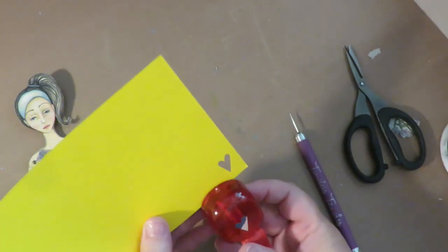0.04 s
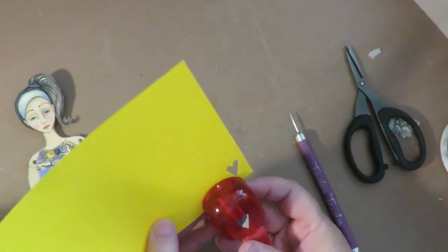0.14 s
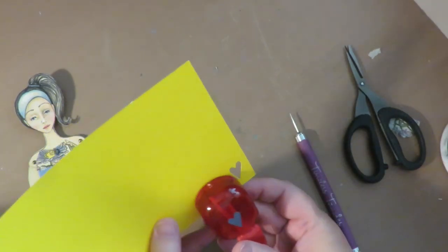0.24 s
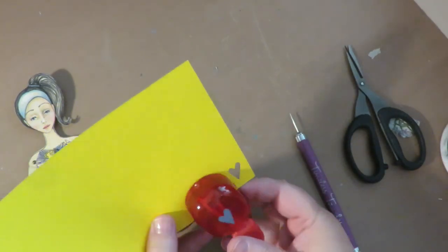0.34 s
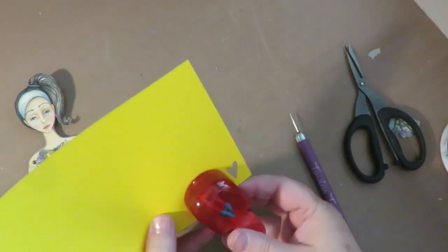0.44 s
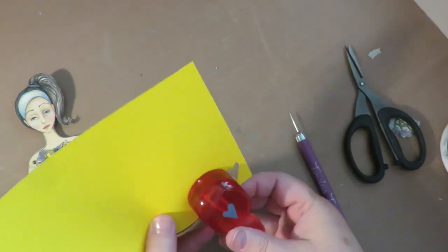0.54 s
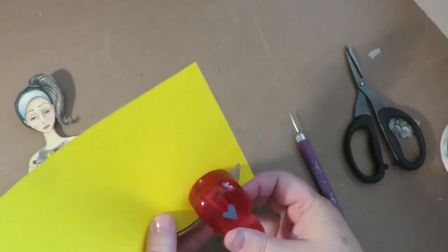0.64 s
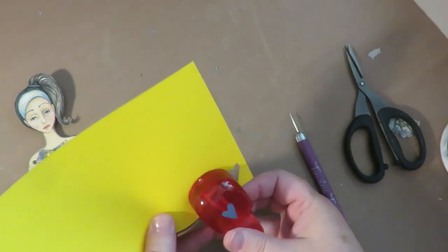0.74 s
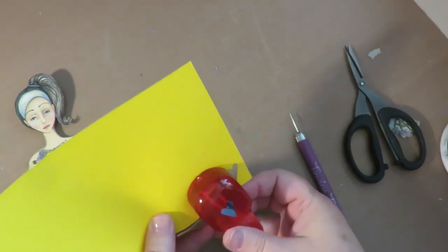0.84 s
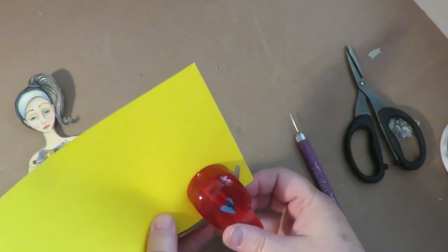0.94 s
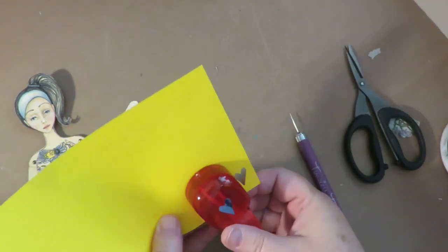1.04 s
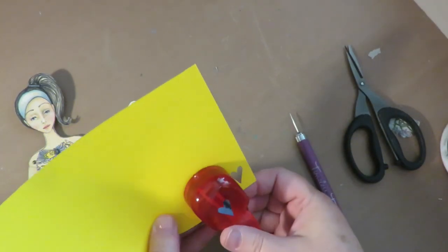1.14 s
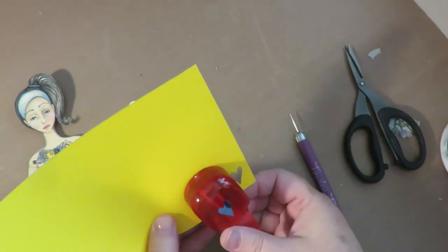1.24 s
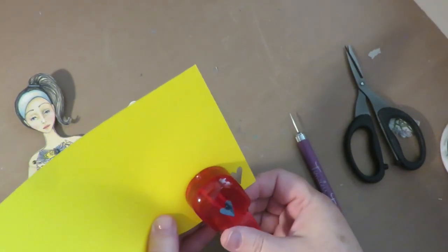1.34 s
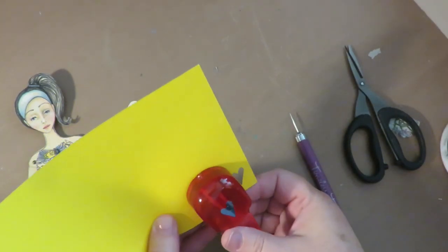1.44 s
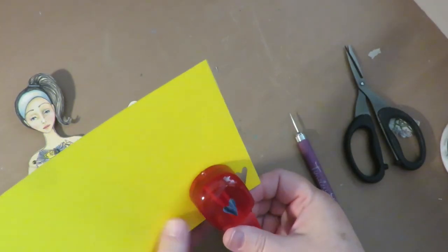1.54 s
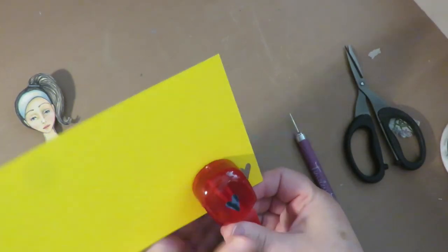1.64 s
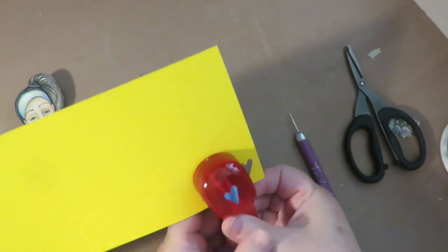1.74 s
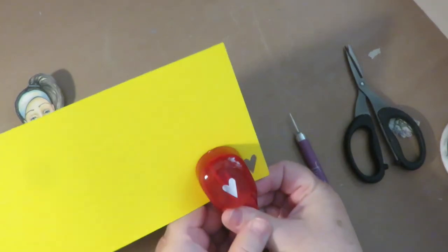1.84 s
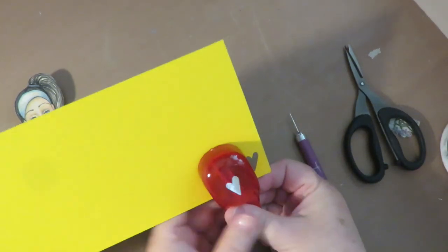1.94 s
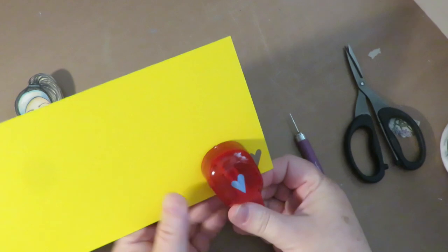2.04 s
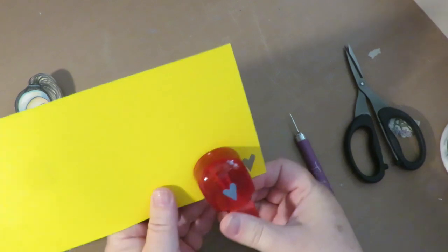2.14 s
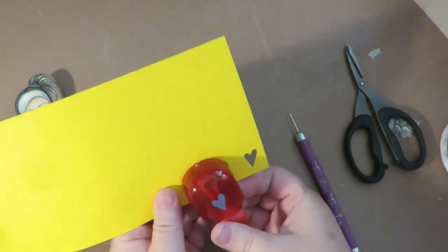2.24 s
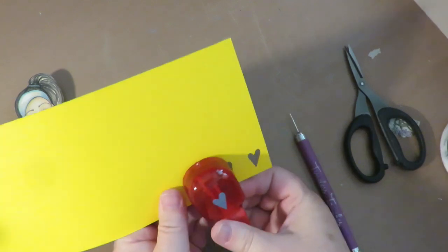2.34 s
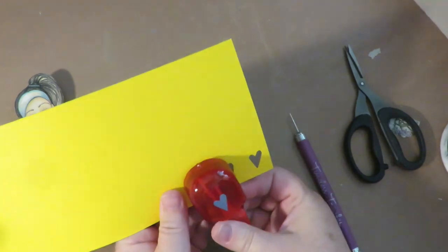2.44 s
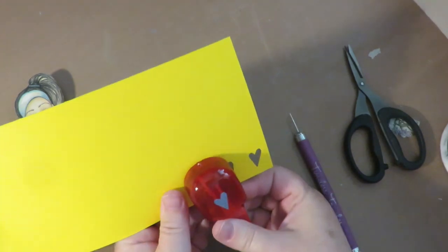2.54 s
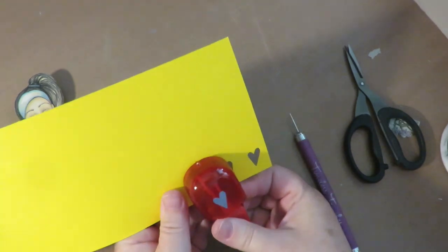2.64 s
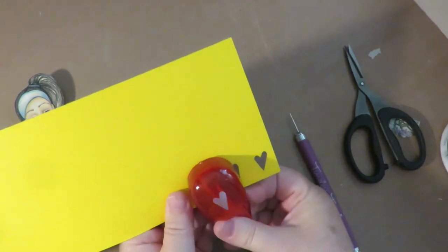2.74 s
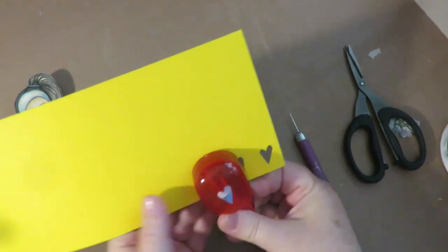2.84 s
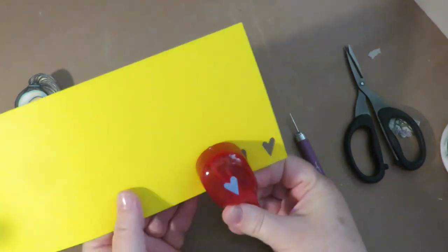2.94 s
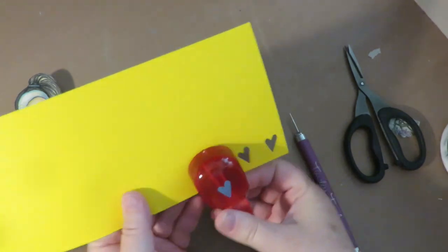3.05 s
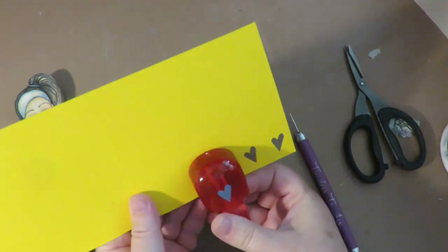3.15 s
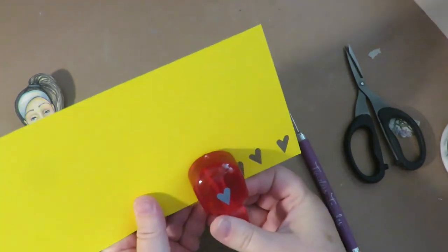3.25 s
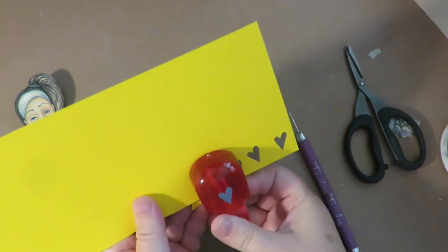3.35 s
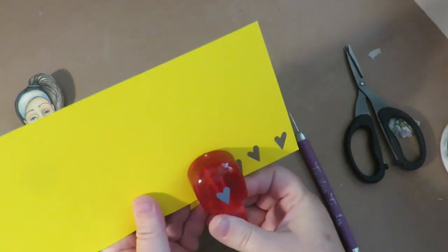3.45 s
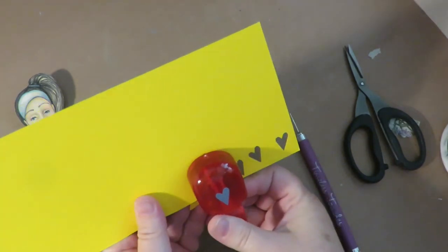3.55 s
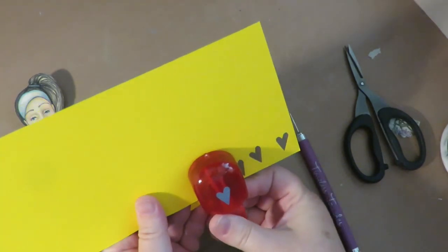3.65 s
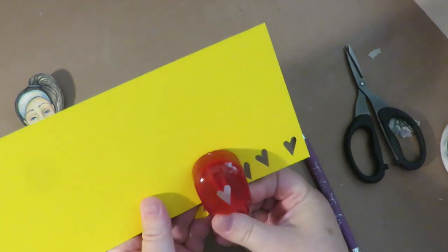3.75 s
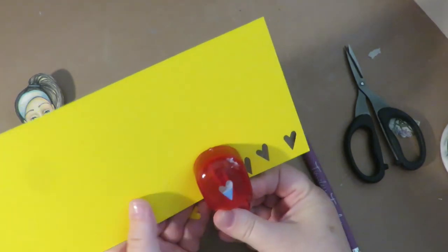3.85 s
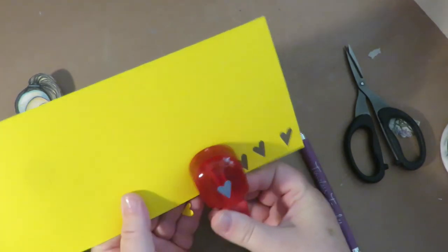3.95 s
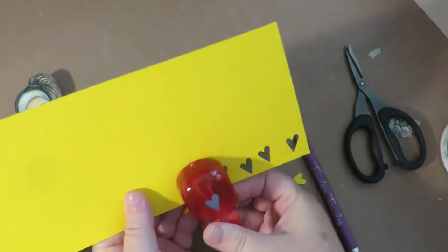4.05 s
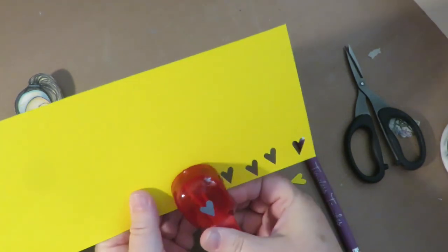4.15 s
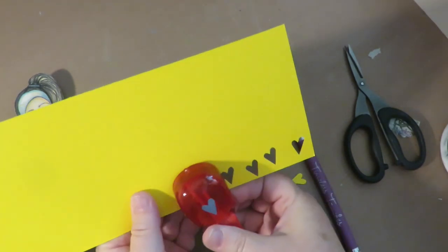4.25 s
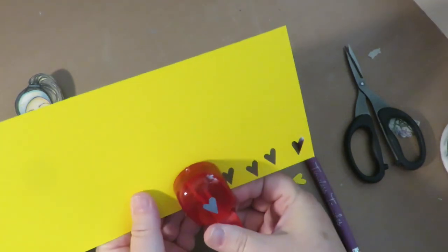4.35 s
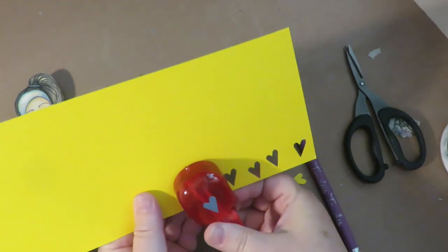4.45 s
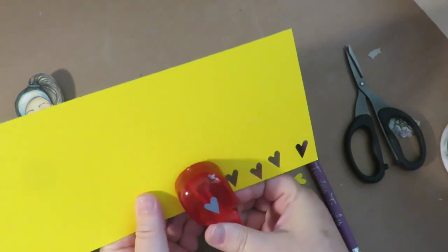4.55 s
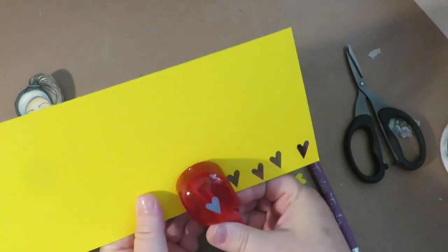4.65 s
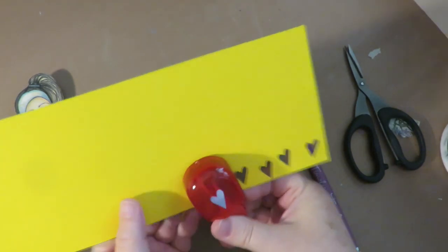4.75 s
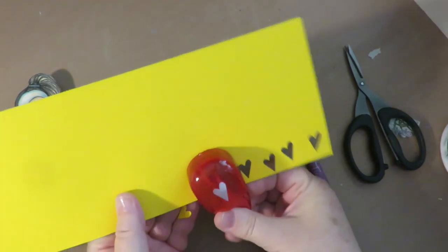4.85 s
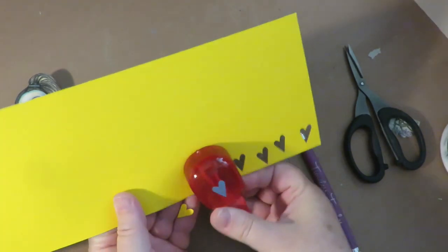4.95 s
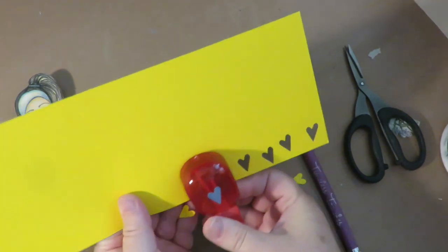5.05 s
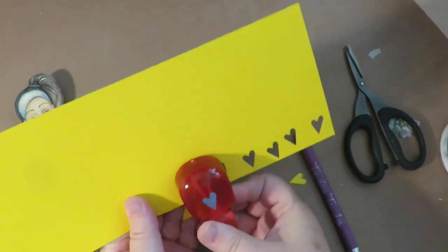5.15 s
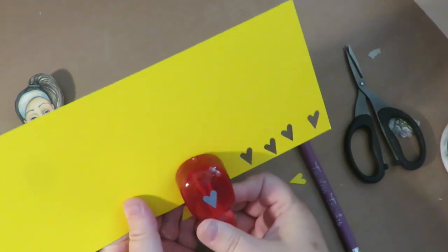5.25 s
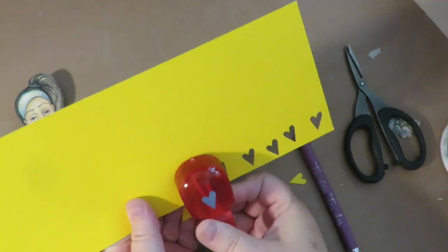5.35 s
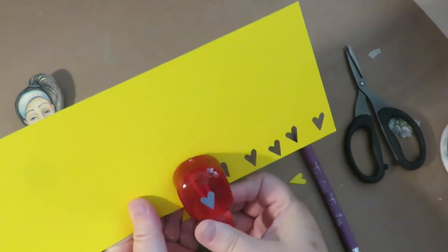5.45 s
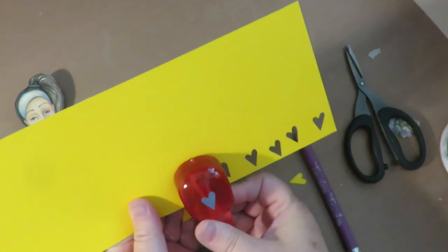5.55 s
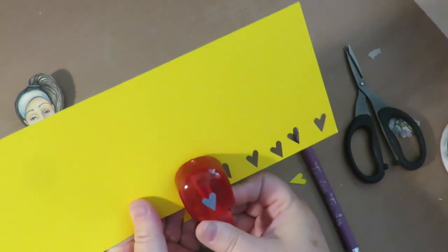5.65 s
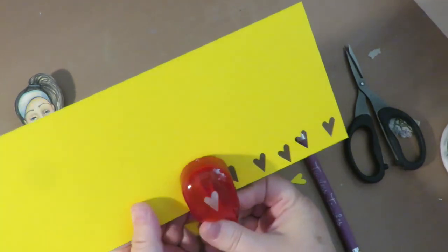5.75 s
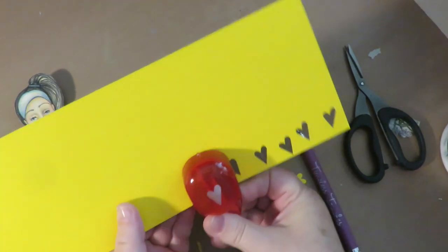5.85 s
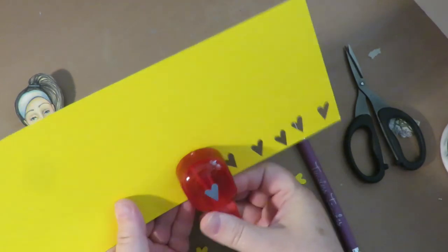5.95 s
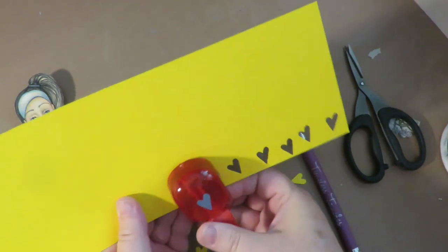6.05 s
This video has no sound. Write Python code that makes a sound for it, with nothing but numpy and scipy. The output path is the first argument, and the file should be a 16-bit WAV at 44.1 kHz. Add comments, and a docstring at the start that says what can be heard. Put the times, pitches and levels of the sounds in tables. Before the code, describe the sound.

A handheld plastic punch cuts a sheet of card close to the microphone. First the card slides and flexes faintly in the slot. Then come five sharp snaps about a second apart, each led by a brief crunch of card. Lighter lever ticks and soft rubbing fall between them, with one louder click after the fourth snap. The small room adds a short echo over faint hum and hiss.

```python
"""A hand-held plastic punch cuts five shapes from a card sheet, close under a camera microphone.
Each stroke: the lever ticks, the die shears the card, the punch snaps home, the spring lets go
and the sheet flexes. Between strokes the card slides in the slot. The punch sits dead centre
in a small room; table and walls echo it all over room hum and microphone hiss."""
import sys
import numpy as np
from scipy import signal
from scipy.fft import rfft, irfft
from scipy.io import wavfile

SR = 44100
rng = np.random.default_rng(int(sys.argv[2]) if len(sys.argv) > 2 else 0)


def unload_audio(sound):
    """Save the sound as a 16-bit wav file, at the path given as the first command line argument."""
    columns = np.transpose(np.atleast_2d(sound))
    # keep every value between -1 and 1, then stretch to whole-number steps
    steps = np.round(np.clip(columns, -1, 1) * 32767)
    wavfile.write(sys.argv[1], SR, steps.astype(np.int16))


N = 268304


def undb(db):
    """Decibels to gain."""
    return 10 ** (np.asarray(db) / 20)


def ring(x, modes, passes=1):
    """Sum of band-pass resonances with alternating sign; more passes soften the rise, steepen the skirts."""
    out = 0
    for k, (hz, width, db) in enumerate(modes):
        b, a = signal.iirpeak(hz, hz / width, fs=SR)
        y = x
        for _ in range(passes):
            y = signal.lfilter(b, a, y)
        out = out + (-1) ** k * undb(db) * y
    return out


def colour(points):
    """Gain at every frequency bin from (frequency [Hz], level [dB]) points."""
    hz, db = np.transpose(points)
    bin_hz = np.arange(N // 2 + 1) * SR / N
    return undb(np.interp(np.log(bin_hz + 1), np.log(hz), db))


def strike(start, peaks_db, body, push, rattle):
    """A push rings a body and the card, the die's rattle rings the metal; each peaks at its own level."""
    # resonances of the thumped card and of the metal die: (frequency [Hz], width [Hz], level [dB])
    card_modes = [(916, 660, 18.5), (477, 990, 4.5), (1070, 190, -41), (375, 570, -12.5), (111, 25, -5.5)]
    metal_modes = [(3550, 950, -3), (5600, 1300, 0), (7100, 2800, -7.5), (9750, 1100, -4),
                   (11460, 1900, -13.5), (14400, 2900, -21.5)]
    parts = ring(push, body, passes=3), ring(push, card_modes, passes=2), ring(rattle, metal_modes)
    out, i = np.zeros(N + SR), int(start * SR)
    out[i:i + len(push)] = sum(undb(db) * p / np.abs(p).max() for db, p in zip(peaks_db, parts))
    return out[:N]


def gestures(moves, rise_db_s, fall_db_s):
    """Each move swells, holds and dies away; gains of its main part and of its second colour."""
    t, gains = np.arange(0, N, 32) / SR, 0
    for full_at, held, db, second_db in moves:
        before, after = np.maximum(full_at - t, 0), np.maximum(t - full_at - held, 0)
        gain = undb(db - rise_db_s * before - fall_db_s * after)
        gains = gains + np.outer([1, undb(second_db)], gain)
    return [np.interp(np.arange(N) / SR, t, g) for g in gains]


def room_tone(mid_db=-53.5):
    """Steady room hum and microphone hiss, partly unlike left and right."""
    # spectrum of hum and hiss, and of their side signal against the mid: (frequency [Hz], level [dB])
    spectrum = [(15, -63), (25, -10), (82, -6), (156, -6.5), (241, -4), (307, -7), (555, -4.5), (602, -8.5),
                (727, -6.5), (1430, -11.5), (2020, -10.5), (2440, -11.5), (15700, -16)]
    side_balance = [(60, -7), (110, -8), (200, -0.5), (380, 1.5), (700, -1), (1290, -2), (2380, -5),
                    (4400, -3), (8120, -1.5), (15000, 0)]
    mid, side = rfft(rng.standard_normal((2, N))) * colour(spectrum)
    mid, side = irfft(mid, N), irfft(side * colour(side_balance), N)
    return np.array([mid + side, mid - side]) * undb(mid_db) / np.std(mid)


def lever_ticks(contact_s=0.000059, width_per_pitch=1.29):
    """Light contacts of lever and spring make short, broad clicks."""
    # ticks: (time [s], click [dB], card thump [dB], metal crack [dB], click pitch [Hz])
    ticks = [(0.0226, -31.5, -39, -58, 1680), (2.0371, -35, -29.5, -40, 1540),
             (2.1297, -52, -41, -62, 1200), (2.228, -31, -34, -39, 2660), (2.578, -22, -37, -35, 1460),
             (3.07, -17.5, -64, -37.5, 1690), (3.1985, -66, -42, -54, 1240), (3.268, -63, -46, -61, 1300),
             (3.709, -22.5, -31, -33.5, 1907), (3.9912, -25.5, -26.5, -47, 1615),
             (4.1034, -44, -29.5, -54.5, 1250), (4.675, -20, -24.5, -36, 1340),
             (4.9324, -40, -29, -64, 1560), (5.0297, -6.5, -11.5, -24, 1960),
             (5.7386, -30.5, -37.5, -40, 2090), (5.9502, -44, -25.5, -51, 1350),
             (6.0043, -23.5, -47, -34.5, 1987)]
    out, t = 0, np.arange(SR // 20) / SR
    push = t * np.exp(-t / contact_s)
    for start, *peaks_db, hz in ticks:
        rattle = rng.standard_normal(len(t)) * t * np.exp(-t / 0.00085)
        out = out + strike(start, peaks_db, [(hz, width_per_pitch * hz, 0)], push, rattle)
    return out


def sheet_flex(pops_per_s=260):
    """The card buckles in small separate pops that ring its modes; wide bends reach the lowest ones."""
    # bends: (fully on at [s], held [s], level [dB], lowest modes against the body [dB])
    bends = [(0.028, 0.0062, -52.5, 2.5), (0.2, .2, -63.5, -7.5), (0.94, 0.013, -53, -5),
             (1.075, 0.014, -55, -5.5), (1.18, 0.047, -60.5, -9), (1.575, 0.0049, -59.5, -2),
             (1.79, 0.017, -26.5, -15), (1.94, .005, -44, -18), (2.0, 0.0071, -57, -4),
             (2.05, 0.02, -47, -4), (2.132, 0.0039, -53.5, 9), (2.16, .04, -57, -21),
             (2.25, 0.015, -51, -9), (2.35, 0.02, -51.5, -33), (2.83, 0.0092, -40.5, -30),
             (3.0, 0.016, -51, -24), (3.072, 0.0029, -38.5, -9), (3.205, 0.0067, -50, 6),
             (3.27, 0.0096, -59, 11), (3.8, 0.006, -33.5, -5), (3.83, 0.022, -56, -9),
             (3.996, 0.006, -32, -3.5), (4.106, 0.0086, -39.5, -6.5), (4.16, 0.034, -64.5, 4.5),
             (4.936, 0.047, -54.5, -8), (5.1, 0.016, -35.5, -11.5), (5.952, .09, -46, -5)]
    # body and lowest resonances of the sheet: (frequency [Hz], width [Hz], level [dB])
    body_modes = [(855, 306, 6), (558, 79, -4), (994, 580, -2)]
    low_modes = [(229, 380, -5), (450, 280, 2.5)]
    pops = (rng.random(N) < pops_per_s / SR) * rng.choice([-1, 1], N)
    pops = pops * undb(2.2 * rng.standard_normal(N))
    body, low = ring(pops, body_modes, passes=2), ring(pops, low_modes, passes=2)
    body_gain, low_gain = gestures(bends, rise_db_s=1590, fall_db_s=457)
    return body_gain * body / np.std(body) + low_gain * low / np.std(low)


def card_slide(spread_db=5.0):
    """The card edge rubs the slot in dense, uneven micro-slips, with a bright scrape on top."""
    # slides: (fully on at [s], held [s], level [dB], bright scrape against the rub [dB])
    slides = [(0.03, .02, -54, -7.5), (0.1, 0.082, -55.5, -17), (0.2, 0.21, -50, -8.5),
              (0.5, .06, -57, -24), (0.6, .06, -63.5, -17), (0.82, 0.026, -60.5, -25),
              (0.91, 0.0092, -50.5, -25), (0.948, 0.0098, -43.5, -25), (1.01, 0.054, -53.5, -7),
              (1.075, 0.0057, -49, -5), (1.195, 0.0052, -49, -24), (1.575, .005, -54.5, -13),
              (1.615, 0.0081, -50.5, -6.5), (1.69, 0.0074, -60, -19), (2.045, 0.093, -58, -9),
              (2.17, 0.012, -53.5, -10), (2.245, 0.026, -46.5, -3.5), (2.355, 0.023, -52, -11),
              (2.76, 0.011, -51.5, -13), (2.92, 0.071, -57, -4), (3.035, 0.0053, -49, -4),
              (3.075, 0.0037, -43.5, -16), (3.11, 0.027, -63, 7), (4.0, 0.0081, -46.5, -7),
              (4.05, 0.022, -62.5, 5.5), (4.12, .08, -57, -8), (4.9, 0.027, -56, -7),
              (4.98, 0.042, -56.5, -9), (5.09, 0.081, -54.5, -3), (5.97, 0.018, -54, -3),
              (6.01, 0.0043, -48, -6.5)]
    # rub and scrape resonances of the slot: (frequency [Hz], width [Hz], level [dB])
    rub_modes = [(1800, 800, -5), (2250, 400, -8), (2760, 420, 0)]
    scrape_modes = [(5050, 230, -2), (3986, 550, -12), (5870, 1500, -22), (9000, 4000, -22)]
    slips = rng.standard_normal(N) * undb(spread_db * np.minimum(rng.exponential(size=N), 5))
    rub, scrape = ring(slips, rub_modes, passes=2), ring(slips, scrape_modes)
    rub_gain, scrape_gain = gestures(slides, rise_db_s=704, fall_db_s=369)
    return rub_gain * rub / np.std(rub) + scrape_gain * scrape / np.std(scrape)


def die_cuts(fade_s=.002):
    """Fibres part one after another as the die scrapes through or out of the card."""
    # cuts: (time [s], rasp [dB], card thump [dB], metal crack [dB],
    #        rasp pitch [Hz], rasp width [Hz], length [s])
    cuts = [(1.7756, -22, -38, -27, 2000, 1900, 0.014), (1.9200, -23, -19.5, -56, 1410, 1100, 0.0092),
            (2.7729, -10.5, -25.5, -22, 1840, 1410, 0.0119), (3.7510, -38, -28.5, -51, 2500, 3490, 0.0055),
            (3.7549, -23, -28.5, -22, 2900, 3500, 0.011), (4.7926, -19.5, -27.5, -20, 2090, 2540, 0.012),
            (5.0206, -24, -51, -38, 2800, 3500, 0.006), (5.7855, -14.5, -33.5, -22.5, 2070, 2170, 0.0108)]
    out, t = 0, np.arange(SR // 20) / SR
    for start, *peaks_db, hz, width, length in cuts:
        envelope = np.clip(t / fade_s, 0, 1) * np.clip((length - t) / fade_s, 0, 1)
        tear = rng.standard_normal(len(t)) * envelope
        out = out + strike(start, peaks_db, [(hz, width, 0)], tear, tear)
    return out


def punch_snaps():
    """The punch snaps home and rings its plastic shell, damped by the grip."""
    # snaps: (time [s], shell ring [dB], card thump [dB], metal crack [dB], grip damping [x])
    snaps = [(1.8437, 0.5, -5.5, -5.5, 2.83), (2.7838, 1, -12.5, -5.5, 1.15), (3.78, -1, -11.5, -6, 0.92),
             (4.8266, -1, -11, -6.5, 0.88), (5.8078, 0, -10, -8, 0.94)]
    # resonances of the shell: (frequency [Hz], width [Hz], level [dB])
    shell_modes = [(1860, 550, 2), (1300, 700, -26), (2900, 970, -11.5)]
    out, t = 0, np.arange(SR // 20) / SR
    impulse = 1. * (t == 0)
    for start, *peaks_db, damping in snaps:
        gripped = [(hz, damping * width, db) for hz, width, db in shell_modes]
        rattle = rng.standard_normal(len(t)) * t * np.exp(-t / .0008)
        out = out + strike(start, peaks_db, gripped, impulse, rattle)
    return out


def small_room(x):
    """At the microphone: direct sound, first reflections, standing resonances and a diffuse tail."""
    # first reflections off table and walls: (delay [s], level [dB])
    echoes = [(.0017, -13), (.0031, -13), (.0045, -13.5), (.0064, -6), (.0100, -14), (0.011, -12.5),
              (0.017, -16.5), (.0185, -18), (.0215, -23.5), (0.0247, -17), (0.028, -22.5), (0.035, -22.5),
              (0.0367, -19.5)]
    # lasting resonances of the space over the table: (frequency [Hz], level [dB], t60 [s])
    room_modes = [(408, -56.5, 0.25), (538.8, -43, 0.21), (731.4, -47.5, .2), (828, -41, 0.16),
                  (1023.5, -44.5, 0.16), (1142.4, -42.5, 0.15), (1256, -54.5, 0.26), (1513, -54, 0.29),
                  (1723, -78, 0.12), (1888, -52, 0.12), (2037, -51, 0.15), (2250, -58, 0.1),
                  (2800, -52, 0.14), (9883, -46, .1)]
    # bands of the diffuse tail: (frequency [Hz], t60 [s], level [dB])
    tail_bands = [(232.2, 0.15, -26.5), (566.6, 0.22, -33.5), (1200, 0.23, -40), (2480, 0.23, -45),
                  (5000, 0.19, -31.5), (10200, 0.11, -23.5)]
    t = np.arange(SR // 2) / SR
    early = 1. * (t == 0)
    for delay, db in echoes:
        cutoff_hz = 93 / delay  # later reflections are duller
        pole = np.exp(-2 * np.pi * cutoff_hz / SR)
        arrival = np.arange(len(t)) == int(delay * SR)
        early += undb(db) * signal.lfilter([1 - pole], [1, -pole], arrival)
    standing = sum(undb(db - 60 * t / t60) * np.sin(2 * np.pi * (hz * t + rng.random()))
                   for hz, db, t60 in room_modes)
    tail = sum(undb(db - 60 * t / t60) * ring(rng.standard_normal(len(t)), [(hz, hz, 0)])
               for hz, t60, db in tail_bands)
    build = np.clip(t / .008, 0, 1) ** 2  # the reverberation takes 8 ms to gather
    return signal.fftconvolve(x, early + build * (standing + tail))[:N]


def scene():
    """Punch and card close up and dead ahead of the microphone, over stereo room tone."""
    close_up = punch_snaps() + lever_ticks() + die_cuts() + sheet_flex() + card_slide()
    return small_room(close_up) + room_tone()


def record(dry):
    """The camera rounds the loudest peaks, then cuts the deep bass and the very top."""
    low_cut_hz, top_hz = 55, 15800
    low_cut = signal.butter(2, low_cut_hz, "high", fs=SR, output="sos")
    top_cut = signal.ellip(14, .2, 95, top_hz, fs=SR, output="sos")
    rounded = signal.sosfilt(low_cut, np.tanh(dry))
    return signal.sosfilt(top_cut, .94 * rounded)


dry = scene()
out = record(dry)
unload_audio(out)
```